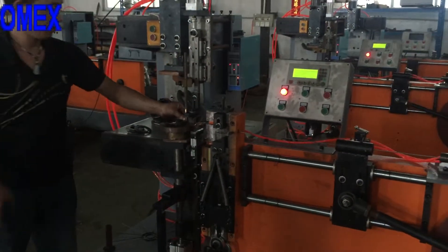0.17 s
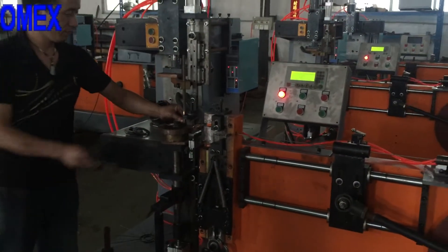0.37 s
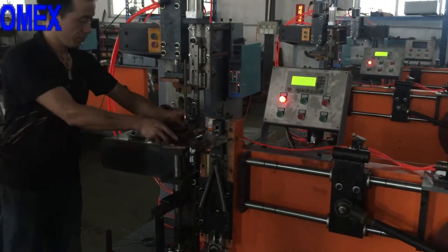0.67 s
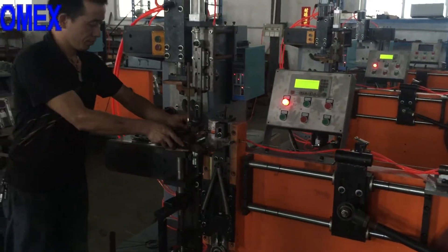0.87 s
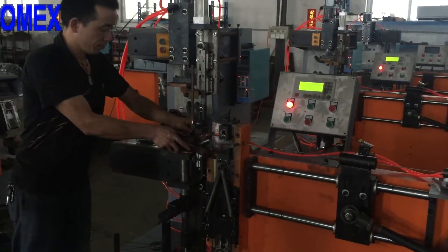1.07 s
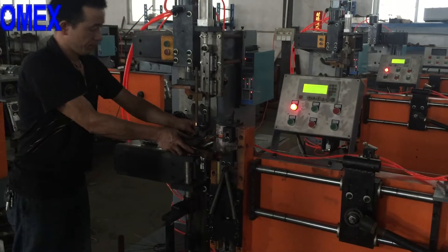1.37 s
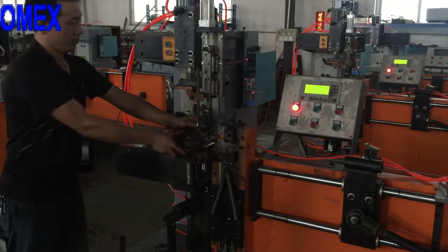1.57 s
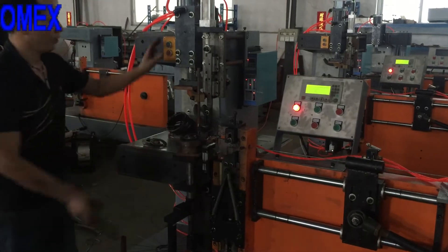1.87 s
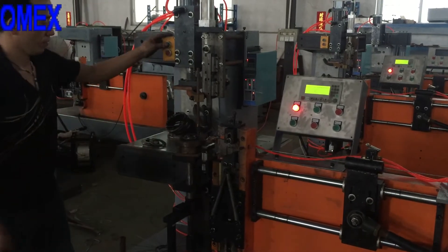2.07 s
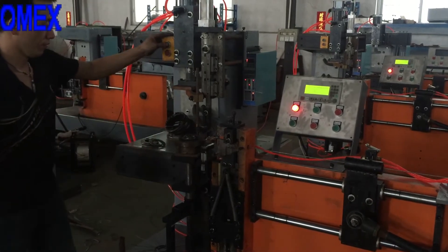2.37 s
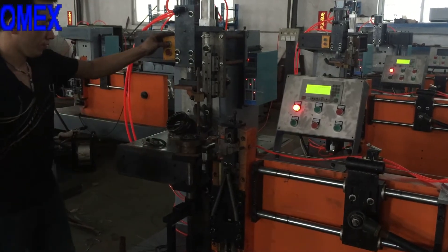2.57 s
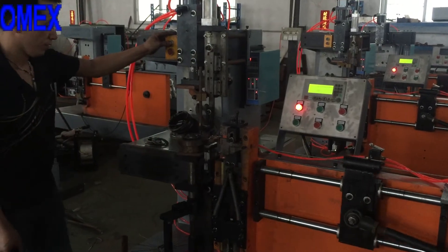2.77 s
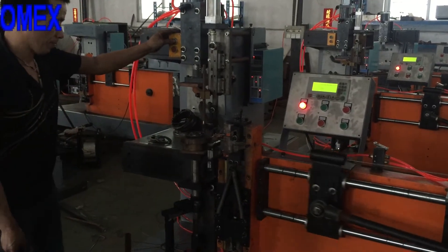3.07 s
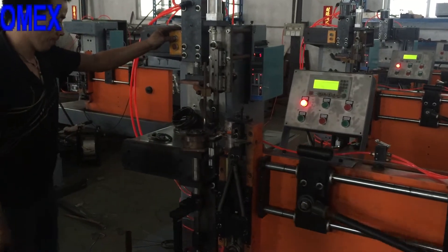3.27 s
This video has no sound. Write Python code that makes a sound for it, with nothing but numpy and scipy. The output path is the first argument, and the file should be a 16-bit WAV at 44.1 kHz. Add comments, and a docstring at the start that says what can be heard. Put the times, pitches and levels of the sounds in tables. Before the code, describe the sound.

A factory compressor hums and clatters steadily with rapid airy puffs, over a motor whine and distant machine roar. Small steel parts jingle in the first half second and clink once near 1.1 seconds. The sound drops out briefly at 2. A welding machine hisses air at 2.2, then rumbles and knocks dully. At 3.2 comes a sharper hiss and a loud clamp slam, echoing briefly in the hall.

```python
"""A factory hall, mono. A piston compressor runs steadily: its crank orders hum, its valves puff once
a cycle. A worker jingles small steel parts. A welder's air valves vent twice, its carriage rumbles,
its base knocks and its clamp slams on the frame. Behind them: a motor whine and the roar of distant
machines. The sound drops out for a moment near 2 s."""
import sys
import numpy as np
from scipy import signal
from scipy.fft import rfft, irfft, next_fast_len
from scipy.io import wavfile
from scipy.ndimage import uniform_filter1d, map_coordinates

SR = 44100
rng = np.random.default_rng(int(sys.argv[2]) if len(sys.argv) > 2 else 0)


def transcribe(u):
    """Save the signal u as a 16-bit wav file named by the first command-line argument.

    u: samples, shape (n,) or (channels, n), limited to [-1, 1]; the rate is SR.
    q: integer samples, one column per channel.
    """
    v = np.clip(np.atleast_2d(u).T, -1, 1)
    q = np.round(v * 32767).astype(np.int16)
    wavfile.write(sys.argv[1], SR, q)


N = 150381

# Strongest multiples of the compressor cycle. Each row: order, rms level in dB.
STRONG_ORDERS = [(8, -43), (10, -40), (12, -37), (14, -44), (16, -50), (17, -49), (18, -40), (20, -50),
                 (22, -48), (24, -41), (25, -49), (26, -48), (28, -42), (30, -43), (31, -47), (32, -43),
                 (34, -47), (36, -45), (40, -49), (42, -43), (44, -45), (50, -48), (51, -49), (56, -46),
                 (60, -40), (62, -42), (66, -45), (68, -39), (71, -43), (73, -49), (74, -45), (75, -41),
                 (77, -50), (78, -40), (80, -40), (82, -43), (83, -47), (84, -48), (86, -47), (87, -50),
                 (106, -50), (109, -51), (116, -48), (118, -49), (119, -50), (120, -52), (123, -53),
                 (124, -46), (128, -53), (132, -53), (135, -53), (137, -53), (138, -49), (150, -53),
                 (151, -54), (158, -53), (174, -55), (176, -53), (210, -56), (232, -56), (240, -54),
                 (246, -52), (258, -56), (260, -55), (264, -51), (286, -52), (288, -54), (289, -55),
                 (290, -50), (295, -55), (296, -50), (298, -48), (300, -49), (302, -48), (304, -56),
                 (308, -53), (312, -55)]
# Weaker multiples, the clatter. Each row: frequency in Hz, rms level of one order in dB.
CLATTER_SPECTRUM = [(40, -53), (600, -59), (700, -55.5), (950, -58.5), (1400, -65), (1800, -80.5),
                    (2110, -69.5), (2300, -68.5), (3700, -71), (4150, -67), (4600, -71.5), (5480, -73),
                    (6200, -85)]
# Compressor valve air. Each row: frequency in Hz, density in dB per Hz.
VALVE_SPECTRUM = [(1500, -88), (5200, -75.5), (5500, -71), (5800, -71.5), (7400, -82), (10000, -70),
                  (10500, -80), (11200, -71.5), (14500, -75.5), (15800, -75)]
# Welder vents. Each row: start in seconds, level in dB, rise, hold and t60 in seconds,
# nozzle peak in Hz, its height in dB.
VENTS = [(2.237, -19.5, 0.013, 0.037, 0.54, 4100, 2.5), (3.177, -12.5, 0.0052, 0.031, 0.11, 3050, 6.5)]
# Air jet. Each row: frequency in Hz, relative level in dB.
JET_SPECTRUM = [(1000, -14), (2200, -4.5), (3100, -2.5), (4500, -2), (6500, -1), (10400, -6), (13000, -5.5),
                (16000, -10)]
# Clamp blows. Each row: start in seconds, level in dB, ring centre in Hz.
CLAMP_SLAMS = [(3.208, -4.5, 695), (3.212, -11.5, 2900), (3.232, -11.5, 560), (3.25, -16.5, 1050)]
# Welder frame. Each row: frequency in Hz, relative level in dB, t60 in seconds.
FRAME_MODES = [(544, -4.5, 0.26), (599, 4.5, 0.12), (640, -11, 0.096), (702, 7.5, 0.082), (803, -4, 0.061),
               (880, -2, 0.12), (977, -4, 0.22), (1258, -2, .12), (1584, -3, .1), (2740, -30, .15),
               (3260, -16, 0.11), (4100, -14, 0.17), (6100, -9, .15)]
# Dull knocks in the base. Each row: start in seconds, level in dB, ring centre in Hz.
BASE_KNOCKS = [(2.245, -24, 185), (2.3, -26.5, 290), (2.635, -20, 500), (2.805, -21, 285),
               (3.1, -20.5, 430), (3.2, -14, 100), (3.235, -13.5, 110), (3.275, -12, 106), (3.3, -21, 253),
               (3.365, -20, 130), (3.38, -17, 430)]
# Heavy welder base. Each row: frequency in Hz, relative level in dB, t60 in seconds.
BASE_MODES = [(92, 3, 0.17), (110, -5, 0.18), (130, 2, 0.16), (185, -12, 0.25), (253, -3, 0.75),
              (285, -4, 0.22), (430, -1.5, 0.39), (500, -4.5, 0.27)]
# Carriage rumble. Each row: frequency in Hz, relative level in dB.
CARRIAGE_SPECTRUM = [(60, -33), (128, 4), (180, -9.5), (270, -1), (350, -8.5), (440, -5), (600, -12),
                     (720, -6.5), (950, -9), (1300, -14.5), (3000, -43)]
# Rumble envelope. Each row: time in seconds, rms level in dB.
CARRIAGE_LEVELS = [(0, -65), (2.235, -60), (2.25, -26.5), (2.4, -54), (2.65, -30.5), (2.85, -27),
                   (3.0, -27), (3.12, -29.5), (3.2, -22), (3.33, -21.5), (3.41, -28)]
# Small steel parts. Each row: frequency in Hz, relative level in dB, t60 in seconds.
PART_MODES = [(4300, -5, 0.045), (5400, -8, 0.024), (5800, -6, .02), (6780, -3.5, 0.062), (8170, -1, .022),
              (9300, -4, 0.084), (10650, -6, 0.04), (11150, -5, 0.076), (12300, -3, .03),
              (13200, -5, 0.036), (13840, -4, .03), (14350, 1, .03), (15100, -10, .03)]
# Clear clinks. Each row: start in seconds, level in dB, ring centre in Hz.
CLINKS = [(.003, -29, 6800), (.022, -29, 9300), (.051, -19.5, 11500), (.064, -23, 11400),
          (.1122, -13, 14300), (.1124, -16, 7950), (.113, -23, 4300), (.128, -20, 11300),
          (.133, -19.5, 6800), (.172, -24, 12300), (.21, -24, 11400), (.259, -24, 13000), (.27, -17, 12300),
          (.282, -32, 11400), (.44, -26, 11400), (1.108, -17.5, 5400)]
# Envelope of the tiny touches. Each row: time in seconds, level in dB.
TOUCH_LEVELS = [(0, -21), (.06, -26), (.09, -40), (.14, -27), (.22, -31), (.27, -24), (.34, -46), (.5, -54)]
# Hall roar. Each row: frequency in Hz, density in dB per Hz.
ROAR_SPECTRUM = [(25, -82), (45, -85), (80, -57), (250, -63), (340, -61), (540, -56.5), (720, -63.5),
                 (880, -58), (1050, -63), (1450, -67), (2100, -64.5), (2450, -69), (4000, -64.5),
                 (4800, -72), (7400, -75.5), (16000, -90)]
# Machine housing resonances. Each row: frequency in Hz, width in Hz, gain in dB.
HOUSING_RESONANCES = [(1830, 34, 4), (2115, 70, 4), (2630, 42, 1), (3346, 24, 2.5), (3636, 32, 4),
                      (3927, 41, 4.5), (4150, 43, 2.5), (4570, 45, 3.5), (5050, 36, -3), (5330, 53, 5.5)]
# Hall decay. Each row: frequency in Hz, t60 in seconds.
HALL_DECAY = [(100, .6), (300, 0.68), (1000, 0.47), (4000, 1.1), (14000, 0.67)]

CYCLE_HZ = 7.039


def compressor(even_boost_db=1.5):
    """One cycle of orders repeats under the valve air; the crank turn's orders, the even ones, lead."""
    size = round(SR / CYCLE_HZ)
    orders = np.arange(size // 2 + 1)
    clatter_db = along(CLATTER_SPECTRUM, orders * CYCLE_HZ) + even_boost_db * (orders % 2 == 0)
    gain = amp(clatter_db) * np.sqrt(rng.exponential(size=len(orders))) * (orders > 5)
    strong, strong_db = np.transpose(STRONG_ORDERS)
    gain[strong.astype(int)] = amp(strong_db)
    phasors = np.exp(2j * np.pi * rng.random(len(orders)))
    cycle = irfft(gain * phasors, size) * size / np.sqrt(2)
    return valve_air() + np.resize(cycle, N) * amp(0.51 * wobble(4.4))


def valve_air(rise_s=0.0047, fall_s=0.029, puff_db=5.5, flutter_db=0.5):
    """Air puffs through the compressor valves once a cycle; the hiss flutters six times a cycle."""
    t = np.arange(N) / SR
    age_s = t % (1 / CYCLE_HZ)
    puff = (1 - np.exp(-age_s / rise_s)) * np.exp(-age_s / fall_s)
    flutter = np.cos(2 * np.pi * 6 * CYCLE_HZ * (t - 0.0025))
    gain_db = puff_db * (puff / puff.max() - .5) + flutter_db * flutter + .8 * wobble(6)
    return amp(gain_db) * noise(VALVE_SPECTRUM, patchy_db=1.1)


def welder_vents(peak_width_hz=500):
    """Air jets rise, hold and decay; each nozzle has its own spectral peak."""
    t, out = np.arange(N) / SR, np.zeros(N)
    for start_s, db, rise_s, hold_s, t60_s, peak_hz, peak_db in VENTS:
        attack = np.clip((t - start_s) / rise_s, 0, 1)
        decay_db = 60 * np.clip(t - start_s - rise_s - hold_s, 0, None) / t60_s
        air = noise(JET_SPECTRUM, patchy_db=0)
        jet = filtered(air, lambda hz: amp(peak_db * bell(hz, peak_hz, peak_width_hz)))
        out += attack * amp(db - decay_db + 1.3 * wobble(120)) * unit_rms(jet)
    return out


def clamp():
    """The clamp slams on the frame, whose modes ring in close clusters of three."""
    return strike(CLAMP_SLAMS, FRAME_MODES * 3,
                  spread_oct=.8, rise_s=.002, scatter_db=2, crack_db=-12, detune=.025)


def base_knocks():
    """The welder's heavy base knocks dully."""
    return strike(BASE_KNOCKS, BASE_MODES * 2,
                  spread_oct=.3, rise_s=.008, scatter_db=1, crack_db=-60, detune=.03)


def carriage():
    """The carriage rumbles unevenly on its rails."""
    level_db = np.interp(np.arange(N) / SR, *np.transpose(CARRIAGE_LEVELS))
    return amp(level_db) * unit_rms(noise(CARRIAGE_SPECTRUM, patchy_db=2.5))


def steel_parts(touch_count=150, centre_hz=11000):
    """Clear clinks over many tiny touches of parts that differ a little in size."""
    starts_s = np.sort(rng.uniform(0, 0.6, size=touch_count))
    db = np.interp(starts_s, *np.transpose(TOUCH_LEVELS)) + 2 * rng.standard_normal(touch_count)
    touches = np.c_[starts_s, db, np.full(touch_count, centre_hz)]
    jingle = strike(touches, PART_MODES,
                    spread_oct=1.5, rise_s=.001, scatter_db=3, crack_db=-10, detune=.04)
    return jingle + strike(CLINKS, PART_MODES * 2,
                           spread_oct=.18, rise_s=.0012, scatter_db=2.3, crack_db=-4, detune=.0089)


def motor(whine_hz=884.6, rms_db=-36, waver_db=2, drift_rad=0.27):
    """A motor whines, slightly unsteady in phase and level."""
    phase = 2 * np.pi * whine_hz * np.arange(N) / SR + drift_rad * wobble(12)
    return np.sqrt(2) * amp(rms_db + waver_db * wobble(7.77)) * np.sin(phase)


def hall_roar():
    """Distant machines blend; their housings ring faintly."""
    def housings(hz):
        return amp(sum(db * bell(hz, peak_hz, width_hz) for peak_hz, width_hz, db in HOUSING_RESONANCES))
    return filtered(noise(ROAR_SPECTRUM, patchy_db=1.4), housings)


def hall_reverb(x, gain_db=-4.5, delay_samples=400):
    """The hall answers; each frequency dies at its own rate."""
    hz, t, bins = signal.stft(rng.standard_normal(SR), SR, nperseg=256)
    decay = amp(-60 * t / along(HALL_DECAY, hz)[:, None])
    tail = signal.istft(bins * decay, SR, nperseg=256)[1]
    delayed = np.pad(x, (delay_samples, 0))
    return amp(gain_db) * signal.fftconvolve(delayed, tail / np.linalg.norm(tail))[:N]


def strike(blows, modes, spread_oct, rise_s, scatter_db, crack_db, detune, crack_t60_s=0.0091):
    """Each blow rings the modes anew, most those near its centre, with a short crack."""
    out, t = np.zeros(N + SR), np.arange(SR // 3) / SR
    hz, mode_db, t60_s = np.transpose(modes)[:, :, None]
    for start_s, db, centre_hz in blows:
        excited_db = mode_db - 6 * (np.log2(hz / centre_hz) / spread_oct) ** 2
        mistune, phase, scatter = rng.standard_normal((3,) + hz.shape)
        waves = np.sin(2 * np.pi * (hz * (1 + detune * mistune) * t + phase))
        decays = amp(excited_db + scatter_db * scatter - 60 * t / t60_s)
        ring = (decays * waves).sum(0) / np.linalg.norm(amp(excited_db))
        crack = amp(crack_db - 60 * t / crack_t60_s) * rng.standard_normal(len(t))
        attack = 1 - np.exp(-t / rise_s)
        out[round(start_s * SR):][:len(t)] += amp(db) * (ring + crack) * attack
    return out[:N]


def noise(spectrum, patchy_db):
    """Noise of a given dB-per-Hz spectrum, with patches of random gain."""
    bins = signal.stft(rng.standard_normal(N), nperseg=512)[2]
    patches = uniform_filter1d(rng.standard_normal(bins.shape), 4, axis=0)
    patches = unit_rms(uniform_filter1d(patches, 8, axis=1))
    white = unit_rms(signal.istft(bins * amp(patchy_db * patches), nperseg=512)[1][:N])
    return filtered(white, lambda hz: amp(along(spectrum, hz)) * np.sqrt(SR / 2))


def wobble(rate_hz):
    """Smooth random curve through rate_hz knots a second."""
    knots = rng.standard_normal(int(N * rate_hz / SR) + 4)
    return map_coordinates(knots, [np.arange(N) * rate_hz / SR])


def filtered(x, response):
    """Apply the gain response(hz)."""
    size = next_fast_len(N + SR // 2)
    return irfft(rfft(x, size) * response(np.fft.rfftfreq(size, 1 / SR)), size)[:N]


def along(points, hz):
    """Interpolate on a log frequency axis."""
    knots_hz, values = np.transpose(points)
    return np.interp(np.log(hz + 1), np.log(knots_hz + 1), values)


def bell(hz, centre_hz, width_hz):
    return np.exp(-((hz - centre_hz) / width_hz) ** 2)


def amp(db):
    return 10 ** (np.asarray(db) / 20)


def unit_rms(x):
    return x / np.sqrt(np.mean(x ** 2) + 1e-20)


def scene():
    """Mono mix on two channels; only vents and impacts reverberate."""
    near = welder_vents() + clamp() + base_knocks() + steel_parts()
    mono = compressor() + motor() + hall_roar() + carriage() + near + hall_reverb(near)
    return np.array([mono, mono])


def record(dry, drop_s=1.9805, back_s=2.0442, drop_db=-16, fade_t60_s=.022, ceiling=.95, top_hz=15760):
    """Peaks clip softly; the level drops, fades and returns at once; the top treble is cut."""
    t = np.arange(N) / SR
    fade = amp(drop_db - 60 * np.clip(t - drop_s, 0, None) / fade_t60_s)
    gain = np.where((t > drop_s) & (t < back_s), fade, 1)
    clipped = dry / (1 + np.abs(dry / ceiling) ** 6) ** (1 / 6)
    return np.array([filtered(gain * x, lambda hz: 1 / (1 + (hz / top_hz) ** 900)) for x in clipped])


dry = scene()
out = record(dry)
transcribe(out)
```